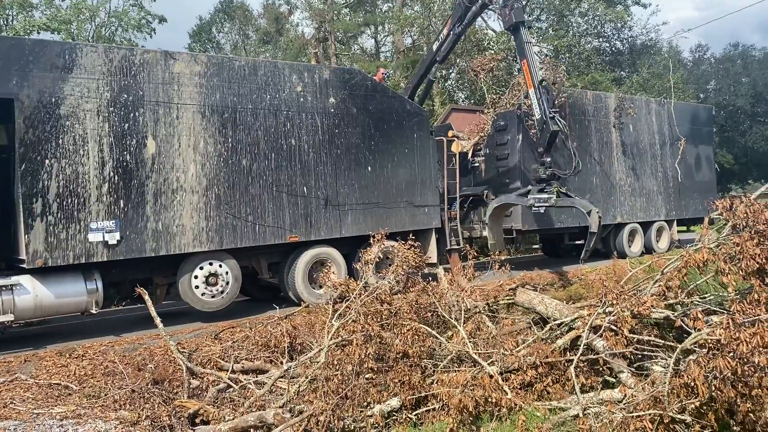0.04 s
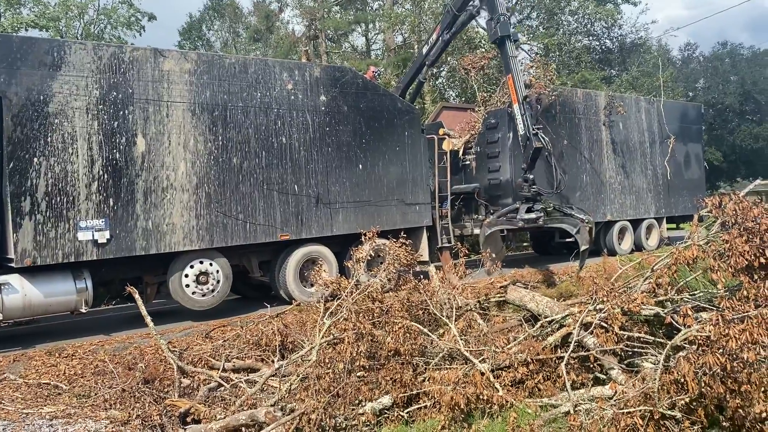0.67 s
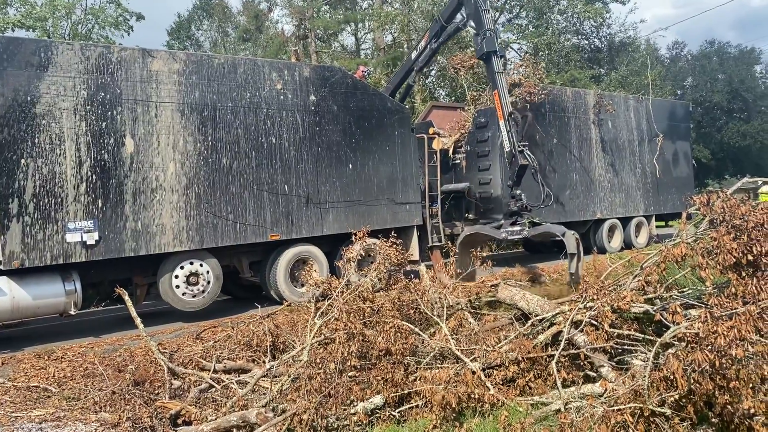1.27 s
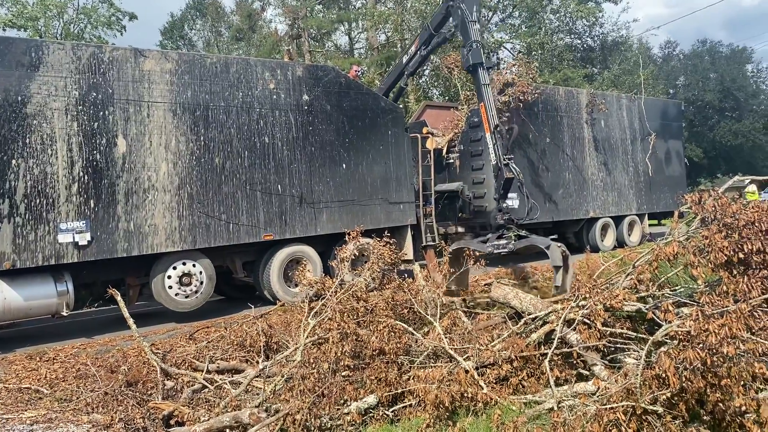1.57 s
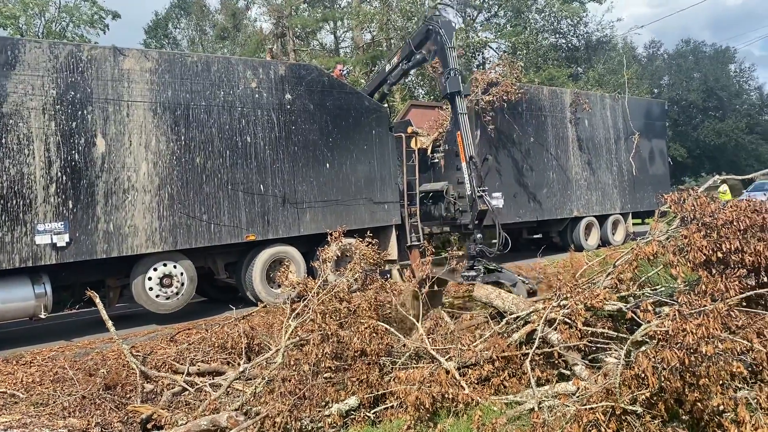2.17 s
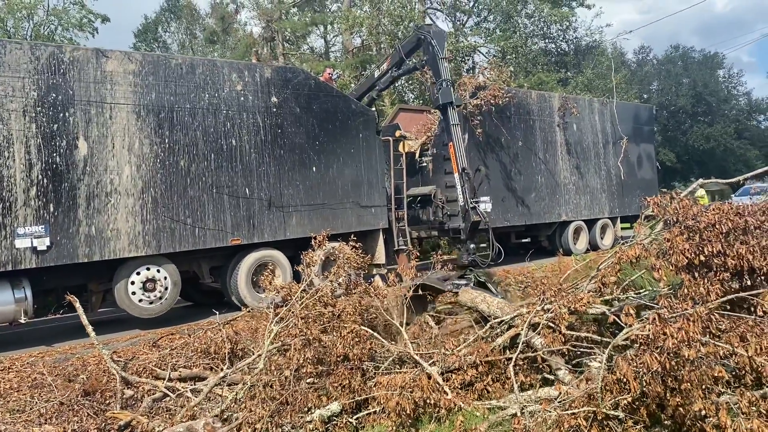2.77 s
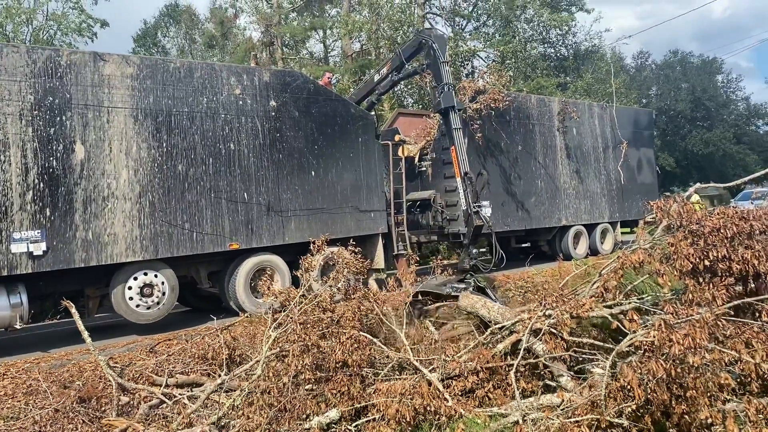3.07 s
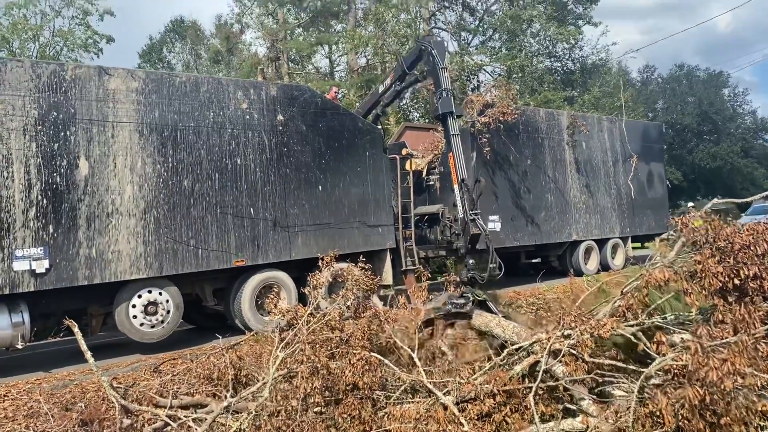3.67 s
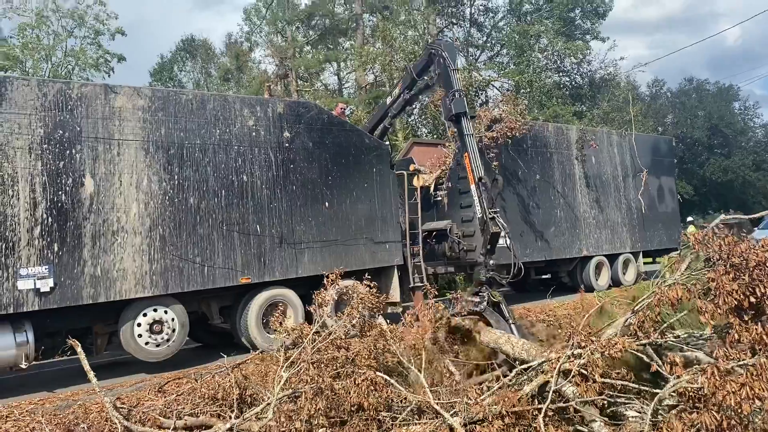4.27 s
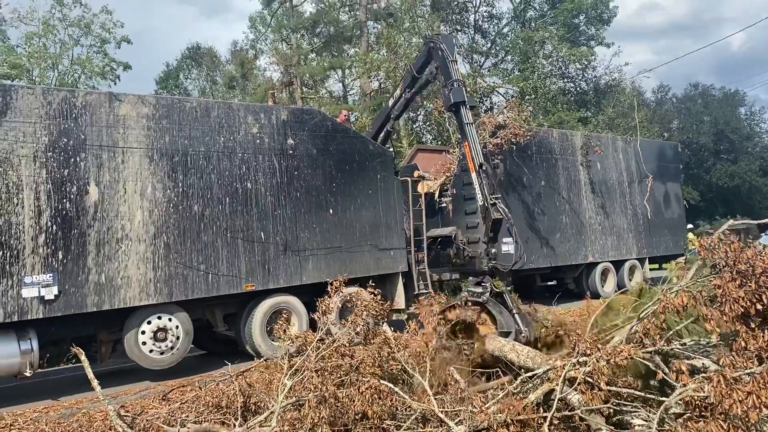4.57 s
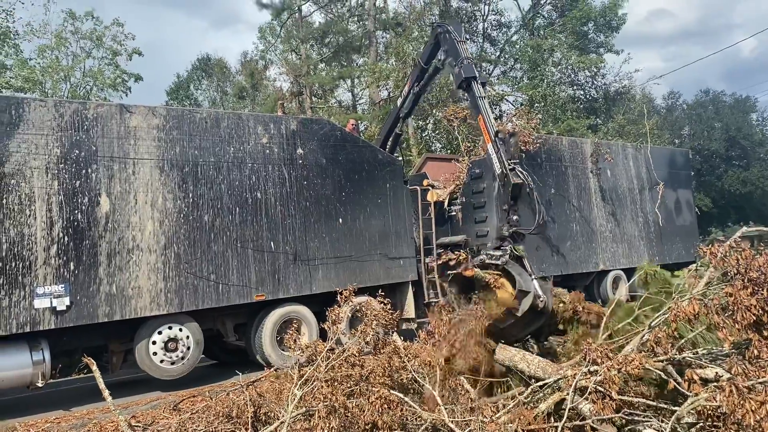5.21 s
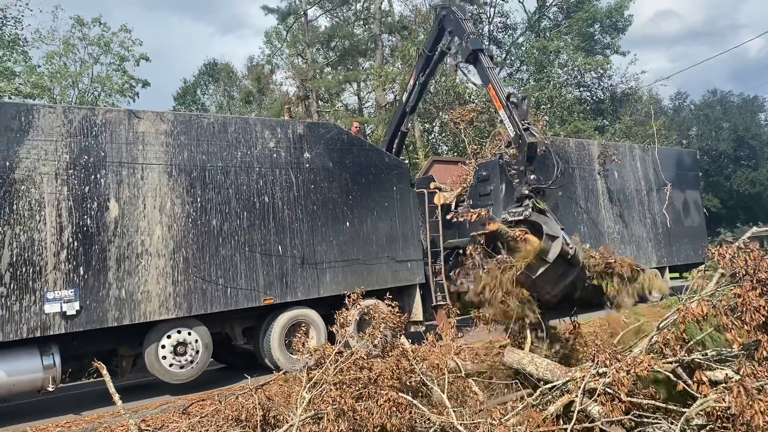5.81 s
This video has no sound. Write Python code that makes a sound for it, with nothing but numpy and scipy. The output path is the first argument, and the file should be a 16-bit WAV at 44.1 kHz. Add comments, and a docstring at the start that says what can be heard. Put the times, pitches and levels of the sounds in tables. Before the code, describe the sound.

A truck's diesel engine rumbles and clatters throughout at a roadside, slightly left of the microphone. A high, fluttering hydraulic whine sounds from the start with faint belt chirps, swelling around 1 second alongside a soft valve hiss. From about 1.8 seconds the grapple crushes dry brush straight ahead: twigs and leaves crackle, branches snap sharply and limbs give short creaks. From 2.7 seconds the exhaust booms harder and the breaking thickens, with woody knocks. The whine fades after 3.4 seconds. A log splits in a run of loud cracks between 3.4 and 4 seconds, the loudest near 3.7, each with a very short outdoor echo. The engine dips briefly and carries on a little softer. From 4.7 to 5.5 seconds more brush crackles and a few branches snap, while the whine returns at about 5.2 seconds over the running engine.

```python
"""A grapple truck's diesel rumbles at a roadside; its pump whines, a belt chirps and a valve hisses.
From about 1.8 s the grapple crushes dry brush: twigs crackle, branches snap by brittle fracture
and limbs creak by stick-slip friction. The exhaust booms harder as a log splits, ringing its modes.
The steel trailer wall and the trees reflect the cracks, and the loudest makes the limiter duck.
A last stroke of the grapple breaks a few more branches while the engine runs on."""
import sys
import numpy as np
from scipy import signal
from scipy.fft import rfft, irfft, next_fast_len
from scipy.io import wavfile
from scipy.ndimage import uniform_filter1d, minimum_filter1d, map_coordinates

SR = 44100
rng = np.random.default_rng(int(sys.argv[2]) if len(sys.argv) > 2 else 0)


def pcm_store(signal):
    """Save signal as 16-bit PCM."""
    levels = np.round(np.clip(np.atleast_2d(signal), -1, 1) * 32767)
    wavfile.write(sys.argv[1], SR, levels.astype(np.int16).T)


N = 257984
PUMP_ORDER = 63  # cycles of whine per turn of the crankshaft


def splits():
    """Dispersion: a splitting log rings its modes, and the slow, low bending waves arrive last."""
    # Each row: start in seconds, level in dB, tear length in seconds, tilt in dB per octave,
    # scale of the bass lag in seconds.
    log_splits = [(2.873, -24, 0.055, -4, .002), (3.137, -20.5, 0.055, 0.5, .002),
                  (3.278, -25.5, 0.045, -3, 0.00196), (3.6825, -5, 0.027, -1, 0.00397),
                  (3.8973, -9.5, .05, -4.5, .0015), (3.922, -18, 0.052, -7, .002),
                  (3.9952, -12.5, 0.021, 0, 0.00067)]
    # Each row: mode frequency in Hz, bandwidth in Hz, relative level in dB.
    log_modes = [(474, 190, -6), (740, 113, 0), (970, 150, -1), (1190, 93, 6.5), (1535, 230, -3.5),
                 (1994, 130, 1.5), (2390, 230, 2.5), (3420, 290, -5), (4550, 400, -9)]
    jolt_db, jolt_s, prompt_hz = -1, .0007, 4000  # waves above prompt_hz arrive without lag
    out, t = np.zeros((2, N)), np.arange(SR // 4) / SR
    jolt = amp(jolt_db) * unit(1.0 * (t == t[int(jolt_s * SR)]))
    for start, db, length, tilt_db, lag in log_splits:
        def wood(hz):
            modes = sum((-1) ** k * amp(level + tilt_db * np.log2(centre / 1100))
                        * resonance(hz, centre, width)
                        for k, (centre, width, level) in enumerate(log_modes))
            delay = lag * np.maximum(np.sqrt(prompt_hz / (hz + 100)) - 1, 0)
            return modes * np.exp(-2j * np.pi * np.cumsum(delay) * hz[1])
        tear = fracture(t, length, ragged_db=5)
        force = unit(noise(len(t)) * tear) + jolt
        add(out, start, amp(db) * np.sqrt(np.mean(tear ** 2)) * unit(filtered(force, wood)))
    return out


def snaps():
    """Dry branches bent past their breaking stress give way one after another."""
    # Each row: start in seconds, level in dB, length in seconds, splinter ring in Hz,
    # relative levels of that ring and of the limb's body in dB.
    branches = [(1.227, -34, .01, 10500, -10, -10), (1.864, -33, .024, 4200, -1, 3),
                (1.9326, -25.5, 0.026, 4100, -4, -3), (2.063, -32, 0.0055, 11500, 3, -15),
                (2.077, -31.5, 0.029, 4700, 1, -1), (2.154, -30, 0.027, 7000, -8, -12),
                (2.204, -29, 0.022, 14000, -4, -16), (2.34, -25.5, 0.059, 6800, -8, -16),
                (2.517, -28, 0.0178, 7000, -9, -10), (2.75, -26.5, 0.02, 7340, -7, 2),
                (2.968, -23.5, 0.018, 7360, -1, 2), (2.988, -26, 0.017, 4200, 2, -2),
                (3.04, -31, 0.014, 4480, 5, -8), (3.136, -37, 0.032, 4700, 1, 5),
                (3.317, -26.5, 0.023, 4200, -3, -8), (3.35, -30.5, 0.042, 14000, -10, -10),
                (3.449, -13.5, 0.018, 4280, -2, -1.5), (3.682, -10, 0.024, 4530, -5.5, 3.5),
                (3.856, -19, 0.0058, 14000, 6, -16), (3.897, -23, 0.026, 4710, -17, 7),
                (3.933, -26, 0.013, 4200, 4, 4), (3.995, -16, 0.019, 4900, -3, 1),
                (4.25, -35, .015, 14000, -12, -13), (4.8312, -17, 0.014, 7350, -11, -6),
                (4.841, -38, 0.05, 4550, -3, -16), (5.042, -23, 0.011, 4640, 3.5, 0),
                (5.303, -27.5, 0.01, 12900, 3, -14.5)]
    out = np.zeros((2, N))
    for start, db, length, ring_hz, ring_db, limb_db in branches:
        add(out, start, amp(db) * snap(length, ring_hz, ring_db, limb_db))
    return out


def snap(length, ring_hz, ring_db, limb_db):
    """Brittle fracture: a click, a broad crack with ringing splinters, a longer sound from the limb."""
    # Each row of these spectra: frequency in Hz, relative spectral density in dB.
    splinter_spectrum = [(1200, -3), (2200, 7.5), (4500, 9.5), (6000, 4), (7400, 4), (10500, -3),
                         (16000, -4.5)]
    limb_spectrum = [(500, -16), (1200, -1), (2100, 15.5), (3200, 0.5), (5000, -10), (9000, -50)]
    click_spectrum = [(2000, -7), (6000, -4.5), (15000, 0)]
    click_db, click_s = 2, .00025
    t = np.arange(SR // 8) / SR
    tear = unit(coloured(noise(len(t)), splinter_spectrum))
    ring = unit(filtered(noise(len(t)), lambda hz: resonance(hz, ring_hz, .18 * ring_hz) ** 2))
    splinters = (tear + amp(ring_db) * ring) * fracture(t, length, ragged_db=-2.5)
    limb = unit(coloured(noise(len(t)), limb_spectrum)) * fracture(t, 1.37 * length, ragged_db=-2)
    click = unit(coloured(noise(len(t)), click_spectrum)) * t / click_s * np.exp(1 - t / click_s)
    return splinters + amp(limb_db) * limb + amp(click_db) * click


def fracture(t, length, ragged_db):
    """Envelope of a break: it rises fast, holds, then decays exponentially as the last fibres part."""
    rise_s, hold_share = .00097, .11
    fibres = np.interp(t, np.arange(200) / 900, rng.standard_normal(200))
    rise = 1 - np.exp(-t / rise_s)
    return rise * amp(ragged_db * fibres - 60 * np.maximum(t / length - hold_share, 0))


def knocks():
    """Damped vibration: loose slabs knock on wavering notes; the bigger, lower ones build up slower."""
    # Each row: start in seconds, level in dB, pitch in Hz, time to fall 60 dB in seconds.
    slabs = [(1.9385, -15, 1830, .022), (2.8825, -13, 1740, 0.03), (3.1375, -9.5, 1920, 0.024),
             (3.142, -11, 2120, .02), (3.153, -20, 1750, 0.056), (3.274, -15, 850, .03),
             (3.4495, -7, 2310, 0.014), (3.683, -6, 2320, 0.011), (3.686, -16, 1190, 0.037),
             (3.696, -9, 727, .06), (3.8985, -14, 1190, .028), (3.902, -10, 538, 0.085),
             (3.9955, -4, 1540, 0.018)]
    rise_cycles = .86
    out, t = np.zeros((2, N)), np.arange(SR // 4) / SR
    knot_times = np.linspace(0, t[-1], 90)
    for start, db, hz, t60 in slabs:
        cycles = hz * t
        swing = (1 - np.exp(-cycles / rise_cycles)) * amp(-60 * t / t60)
        waver = np.array([np.interp(t, knot_times, knots) for knots in rng.standard_normal((3, 90))])
        phase = 2 * np.pi * cycles + .67 * waver[0] + .4 * waver[1:]  # shared, then per channel
        add(out, start, amp(db) * swing * np.sin(phase))
    return out


def creaks():
    """Stick-slip friction: bark catches on the steel tines and excites two close modes of a limb."""
    # Each row: start in seconds, length in seconds, level in dB, pitch between the modes in Hz.
    rubs = [(2.392, 0.12, -29, 2080), (2.639, 0.02, -31, 2410), (2.871, 0.032, -28, 1680),
            (3.142, 0.037, -29, 2030), (3.26, 0.043, -26, 886), (3.262, 0.07, -30.5, 2070),
            (3.397, 0.1, -30.5, 2180)]
    out = np.zeros((2, N))
    for start, length, db, pitch in rubs:
        progress = np.linspace(0, 1, int(length * SR))
        slips = noise(len(progress))
        slips *= amp(3.2 * np.interp(progress, np.linspace(0, 1, 32), rng.standard_normal(32)))
        wood = filtered(slips, lambda hz: resonance(hz, .863 * pitch, .082 * pitch)
                        * resonance(hz, 1.115 * pitch, .14 * pitch))
        add(out, start, amp(db) * unit(wood * np.sin(np.pi * progress ** .5)))
    return out


def crushing():
    """Envelope of the crushing: the grapple's strokes add in power, and the heap settles after each."""
    # Each row: start and end in seconds, crackle level at the end in dB, growth in dB per second.
    strokes = [(1.788, 2.43, -39, 0), (2.783, 3.43, -30, 15.5), (3.562, 3.976, -33.5, 7),
               (4.18, 4.422, -42, 0), (4.72, 5.45, -36, 1)]
    t = np.arange(N) / SR
    envelopes = [amp(db + growth * np.minimum(t - end, 0))
                 * held(start, end, attack_s=.019, release_s=.21) for start, end, db, growth in strokes]
    return np.linalg.norm(envelopes, axis=0)


def brush(crush):
    """Shot noise: crushed twigs and dry leaves give a swarm of tiny ticks over a rustle."""
    # Each row: frequency in Hz, relative spectral density in dB.
    crackle_spectrum = [(700, -63), (2000, 22), (3200, 14.5), (5000, 6), (7500, 4.5), (10000, -0.5),
                        (16000, 1.5)]
    ticks_per_s, decay_s = 150, .008
    ticks = (rng.random(N) < ticks_per_s / SR) * amp(3.1 * np.minimum(rng.exponential(size=N), 3))
    decay = np.exp(-np.arange(SR // 50) / SR / decay_s)
    grains = unit(signal.fftconvolve(ticks, decay)[:N])
    return crush * unit(coloured(noise() * (1 + .81 * grains), crackle_spectrum))


def twigs(crush):
    """Twigs fracture at random, as loudly as the brush is crushed; thicker ones resonate lower."""
    twigs_per_s = 12
    out = np.zeros((2, N))
    for when, strength, girth in rng.random((int(twigs_per_s * N / SR), 3)):
        gain = crush[int(when * N)] * amp(3 * strength - 1)
        crack = snap(length=.014, ring_hz=5500 / (.5 + girth), ring_db=-13, limb_db=-8)
        add(out, when * N / SR, gain * crack)
    return out


def diesel(turns):
    """Periodic excitation: six cylinders fire three times a turn, giving tones, puffs and clatter."""
    # Each row: multiple of the shaft's rate, level in dB.
    crank_orders = [(2, -52), (3, -31.5), (4, -30.5), (5, -32.5), (6, -49.5), (7, -39), (9, -39.5),
                    (29, -42), (48, -52.5), (70, -56)]
    drive_orders = [(2, -37.5), (3, -31), (4, -44), (5, -44.5), (6, -34)]
    firings, drive_turns = 3 * turns, 1.24 * turns  # the pump drive outruns the crankshaft
    crank = shaft_tones(turns, crank_orders, flutter_db=2, jitter_rad=.04)
    drive = shaft_tones(drive_turns, drive_orders, flutter_db=-2, jitter_rad=.24)
    return crank + drive + exhaust(firings) + clatter(firings, drive_turns)


def shaft_tones(turns, orders, flutter_db, jitter_rad):
    """A rotating shaft radiates harmonics of its rate, slightly unsteady in level and phase."""
    tones = np.zeros(N)
    for order, db in orders:
        peak = np.sqrt(2) * amp(db + flutter_db * wobble(12))
        tones += peak * np.sin(2 * np.pi * (order * turns + rng.random()) + jitter_rad * wobble(16))
    return tones


def exhaust(firings):
    """Pulsating gas flow: it rasps more under load and booms as the grapple strains at the log."""
    # Each row of these spectra: frequency in Hz, relative spectral density in dB.
    boom_spectrum = [(20, -53), (40, -27), (60, -4), (90, -16), (105, 6.5), (126, 14.5), (150, 3),
                     (172, -12.5), (260, -65)]
    rasp_spectrum = [(120, -10), (190, 2.5), (215, -1.5), (255, 2), (300, -1.5), (370, -1), (500, -4.5),
                     (620, -17), (1000, -63)]
    boom_db, strain_db, rasp_db, load_db, throb_db = -25, 4, -24.5, 1.5, .8
    strain = held(2.66, 3.65, attack_s=.076, release_s=.036)
    load = held(0, 3.65, attack_s=.11, release_s=.12)
    puffs = noise() * beats(firings, sharp=.071)
    boom = amp(boom_db + strain_db * strain) * unit(coloured(puffs, boom_spectrum))
    rasp = amp(rasp_db + load_db * load + throb_db * wobble(45)) * unit(coloured(puffs, rasp_spectrum))
    return boom + rasp


def clatter(firings, drive_turns):
    """Forced vibration: the engine's rattle radiates from the block and rings its panels."""
    # Each row: frequency in Hz, relative spectral density in dB.
    block_spectrum = [(300, -22), (560, 2), (750, 1.5), (1080, 3.5), (1450, 1.5), (1700, -2), (2100, -5.5),
                      (2500, -3.5), (3100, -9), (3750, -14.5), (4600, -19.5), (6500, -23.5), (9000, -32.5),
                      (12000, -30.5), (14000, -37), (16000, -52)]
    # Each row: mode frequency in Hz, bandwidth in Hz, relative level in dB.
    panel_modes = [(1058, 15.5, -0.5), (1426, 11, -6), (1890, 39, -4.5), (2460, 42, -7.5),
                   (2837, 21, -10.5)]
    rattle = noise() * beats(firings, sharp=.016) * beats(2 * drive_turns, sharp=.08)
    rattle *= amp(.81 * wobble(25.3))
    block = unit(coloured(rattle, block_spectrum))
    panels = unit(filtered(rattle, lambda hz: sum(amp(db) * resonance(hz, centre, width)
                                                  for centre, width, db in panel_modes)))
    return amp(-26) * (block + amp(-13.5) * panels)


def pump(turns):
    """Pressure ripple: the hydraulic pump's fluttering whine grows while oil flows to the rams."""
    # Each row: start and end in seconds, level of the whine in dB.
    flows = [(0, 3.42, -33.5), (.8, 0.99, -28.5), (5.15, 5.6, -33.5)]
    idle_db = -64.5
    power = amp(idle_db) ** 2 + sum((amp(db) * held(start, end, attack_s=.2, release_s=.11)) ** 2
                                    for start, end, db in flows)
    flutter = amp(.92 * wobble(21.56))
    return np.sqrt(2 * power) * flutter * np.sin(2 * np.pi * PUMP_ORDER * turns + wobble(40))


def belt(turns):
    """Friction: a belt sings two tones, louder as it slips, swelling and bending each pulley turn."""
    # Each row: start and end of a slip in seconds, level it adds in dB.
    slips = [(0, .24, -43.5), (.33, 1.75, -54), (.66, 1.2, -49.5)]
    gripping_db, low_order, high_order = -47.5, 173.2, 202.3  # orders of the crankshaft's rate
    level = amp(gripping_db) + sum(amp(db) * held(start, end, attack_s=.0053, release_s=.063)
                                   for start, end, db in slips)
    pulley_turns = 1.2 * turns + .16 * wobble(14)
    chirps = beats(pulley_turns, sharp=.5) * amp(1.1 * wobble(26))
    bend = .55 * np.cos(2 * np.pi * pulley_turns)
    low = np.sin(2 * np.pi * low_order * turns - bend + .25 * wobble(110))
    high = np.sin(2 * np.pi * high_order * turns - bend + .45 * wobble(200))
    return level * chirps * unit(low + amp(-1) * high)


def valve():
    """Throttled flow: oil squeezed through a valve hisses in a narrow band as the crane arm lowers."""
    hiss = unit(filtered(noise(), lambda hz: resonance(hz, centre=4200, width=200) ** 2))
    return amp(-48.5) * held(.7, 1.12, attack_s=.04, release_s=.12) * hiss


def roadside(x):
    """Scattering: the trailer wall and the trees return a short tail whose treble dies first."""
    # Each row: frequency in Hz, time to fall 60 dB in seconds.
    decay_times = [(300, 0.2), (2000, 0.2), (12000, 0.11)]
    hz, t, spectra = signal.stft(rng.standard_normal((2, SR // 2)), SR, nperseg=256)
    decay = amp(-60 * t / along(decay_times, hz)[:, None])
    tail = spread(signal.istft(spectra * decay, SR, nperseg=256)[1])
    return signal.fftconvolve(x, tail / np.linalg.norm(tail[0]), axes=1)[:, :N]


def limiter(x):
    """Gain control: peaks over the ceiling duck the level, which returns in a quick and a slow stage."""
    ceiling_db, quick_share, quick_s, slow_s = -.8, .78, .24, 2.8
    t = np.arange(N) / SR
    over_db = np.maximum(20 * np.log10(np.abs(x).max(axis=0) + 1e-9) - ceiling_db, 0)
    ahead_db = -minimum_filter1d(-over_db, size=129)
    released = lambda s: np.maximum.accumulate(ahead_db * np.exp(t / s)) * np.exp(-t / s)
    duck_db = quick_share * released(quick_s) + (1 - quick_share) * released(slow_s)
    return x * amp(-uniform_filter1d(duck_db, size=65))


def spread(pair):
    """Partial coherence: two independent signals mix, as mid and side, into left and right."""
    # Each row: frequency in Hz, coherence of the two microphone ports from 0 to 1.
    coherence = [(100, .99), (450, .96), (750, .82), (1100, .88), (1800, .62), (2500, .85), (4500, .8),
                 (5700, .58), (7500, .92), (15000, .92)]
    angle = lambda hz: np.arccos(along(coherence, hz)) / 2
    mid, side = filtered(pair, lambda hz: np.array([np.cos(angle(hz)), np.sin(angle(hz))]))
    return np.array([mid + side, mid - side])


def noise(size=N):
    """White noise, partly coherent between left and right."""
    return spread(rng.standard_normal((2, size)))


def filtered(x, response):
    """Linear filtering: the spectrum of x times a complex response of frequency."""
    size = x.shape[-1]
    padded = next_fast_len(size + 8192)
    return irfft(rfft(x, padded) * response(np.fft.rfftfreq(padded, 1 / SR)), padded)[..., :size]


def coloured(x, spectrum):
    """Spectral shaping of x by points of frequency in Hz and gain in dB."""
    return filtered(x, lambda hz: amp(along(spectrum, hz)))


def resonance(hz, centre, width):
    """Frequency response of one damped mode; centre and width are in Hz."""
    return 1j * hz * width / (centre ** 2 - hz ** 2 + 1j * hz * width)


def along(points, hz):
    """Interpolation between points of frequency and value on a logarithmic frequency axis."""
    frequencies, values = np.transpose(points)
    return np.interp(np.log(hz + 1), np.log(frequencies + 1), values)


def held(start, end, attack_s, release_s):
    """Exponential envelope: it rises from start, holds, and decays after end."""
    t = np.arange(N) / SR
    rise = 1 - np.exp(-np.maximum(t - start, 0) / attack_s)
    return rise * np.exp(-np.maximum(t - end, 0) / release_s)


def beats(turns, sharp):
    """Amplitude modulation: one swell a turn, rms 1."""
    return unit(np.exp(sharp * np.cos(2 * np.pi * turns)))


def wobble(rate):
    """Random modulation: a smooth curve with rate knots a second."""
    return map_coordinates(rng.standard_normal(int(N * rate / SR) + 4), [np.arange(N) * rate / SR])


def add(track, start_s, sound):
    """Superposition: mix a sound into the track from start_s."""
    start = round(start_s * SR)
    track[..., start:start + sound.shape[-1]] += sound[..., :N - start]


def amp(db):
    """Decibels to amplitude ratio."""
    return 10 ** (np.asarray(db) / 20)


def unit(x):
    """Normalisation to rms 1."""
    return x / np.sqrt(np.mean(x ** 2) + 1e-20)


def scene():
    """Level and phase differences place the truck to the left; the wood breaks nearly straight ahead."""
    # Each row: time in seconds, pitch of the pump in Hz, which follows the engine's speed.
    pump_pitch = [(0, 1257), (.4, 1266), (.72, 1267), (.88, 1250), (1.08, 1250), (1.3, 1268), (2, 1267),
                  (2.55, 1286), (3.3, 1232), (3.9, 1258), (4.6, 1245), (5.7, 1272)]
    # Each row: frequency in Hz, level of left over right in dB.
    truck_balance = [(60, 0), (300, 0.9), (750, 2.5), (1050, 4.5), (1350, -4.5), (2000, -1), (4000, 2)]
    # Each row: frequency in Hz, phase lead of the left port in radians.
    truck_lead = [(20, 0), (60, .17), (130, .28), (300, .42), (470, .65), (700, 1.1), (1000, .95),
                  (1250, 1.6), (1700, 3.2), (2000, 5), (2500, 6), (3800, 6.7), (5500, 6.1), (7000, 6.28)]
    wood_balance_db, echo_db = -1.2, -8.3
    pump_hz = np.interp(np.arange(N) / SR, *np.transpose(pump_pitch))
    turns = np.cumsum(pump_hz) / PUMP_ORDER / SR
    machine = diesel(turns) + pump(turns) + valve() + belt(turns)
    sides = np.array([[.5], [-.5]])
    truck = filtered(machine, lambda hz: amp(sides * along(truck_balance, hz))
                     * np.exp(1j * sides * along(truck_lead, hz)))
    wood = (snaps() + splits() + knocks() + creaks()) * amp(sides * wood_balance_db)
    crush = crushing()
    return truck + brush(crush) + wood + amp(echo_db) * roadside(wood) + twigs(crush)


def record(dry):
    """The microphone ports part in phase in the treble; saturation, limiting and a band-pass follow."""
    # Each row: frequency in Hz, phase lead of the left port in radians.
    port_lead = [(7400, 0), (8700, -3.1), (9400, -3.2), (10300, -6.2), (11700, -6.3), (12700, -9.4),
                 (13500, -9.5), (14400, -12.5)]
    headroom_db, bottom_hz, top_hz = 5.5, 33, 15750
    sides = np.array([[.5], [-.5]])
    ports = filtered(dry, lambda hz: np.exp(1j * sides * along(port_lead, hz)))
    saturated = ports / (1 + (ports / amp(headroom_db)) ** 6) ** (1 / 6)
    band = lambda hz: hz ** 4 / (hz ** 4 + bottom_hz ** 4) / (1 + (hz / top_hz) ** 200)
    return filtered(limiter(saturated), band)


dry = scene()
out = record(dry)
pcm_store(out)
```